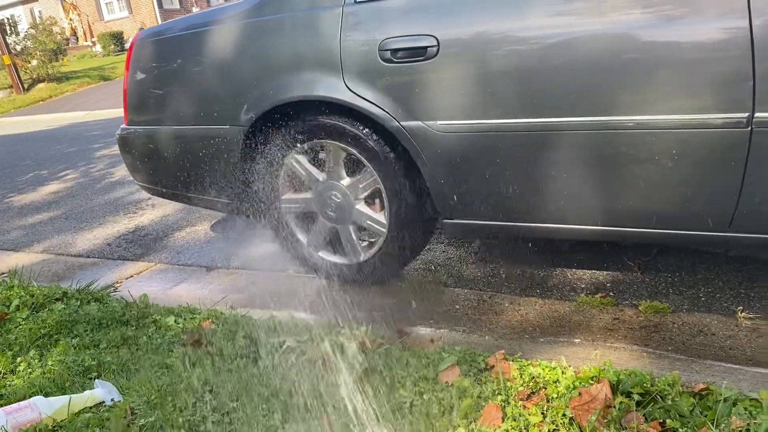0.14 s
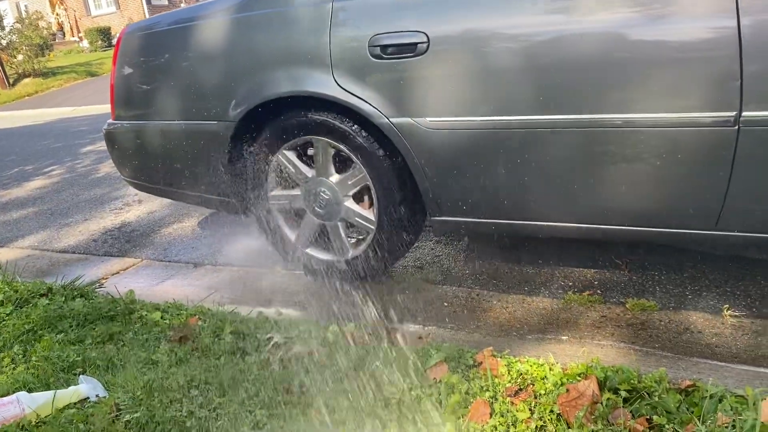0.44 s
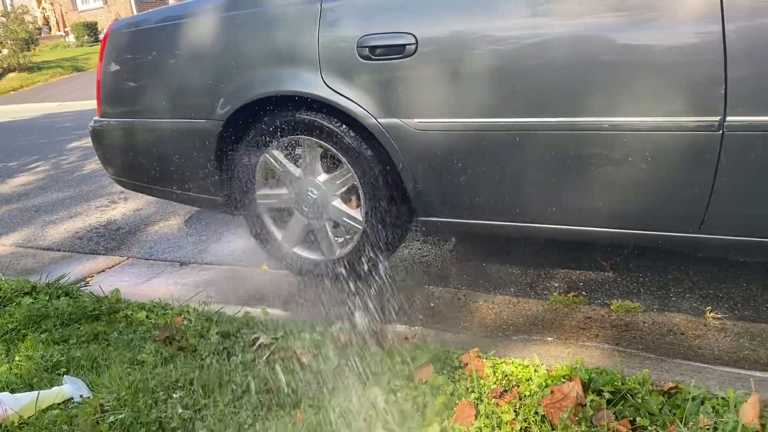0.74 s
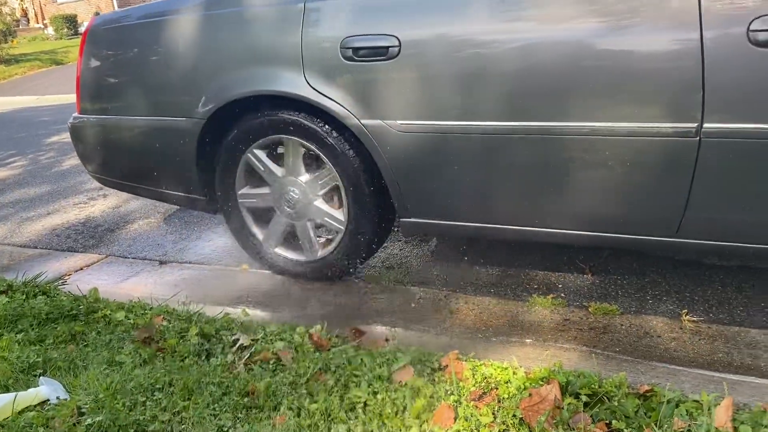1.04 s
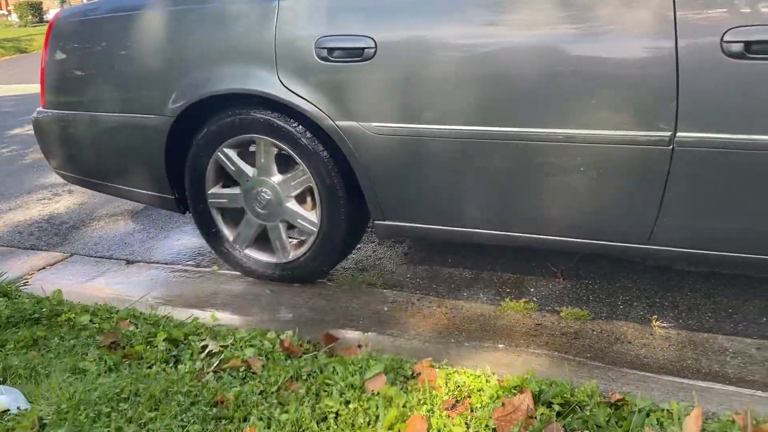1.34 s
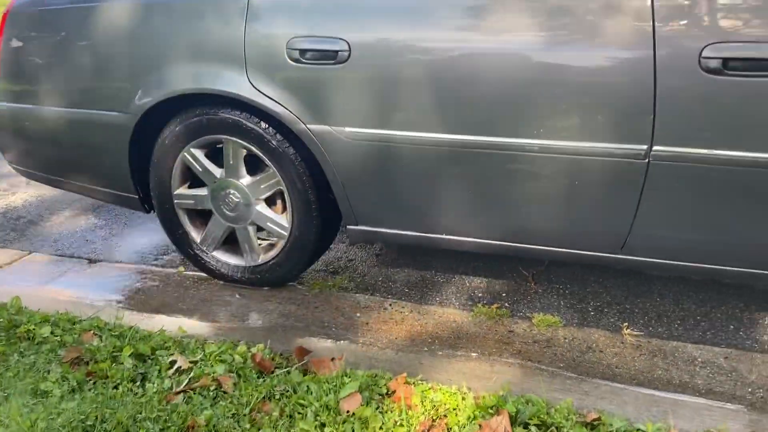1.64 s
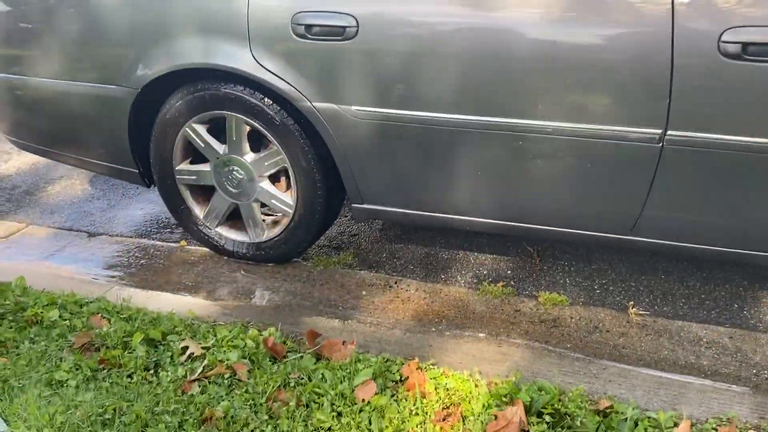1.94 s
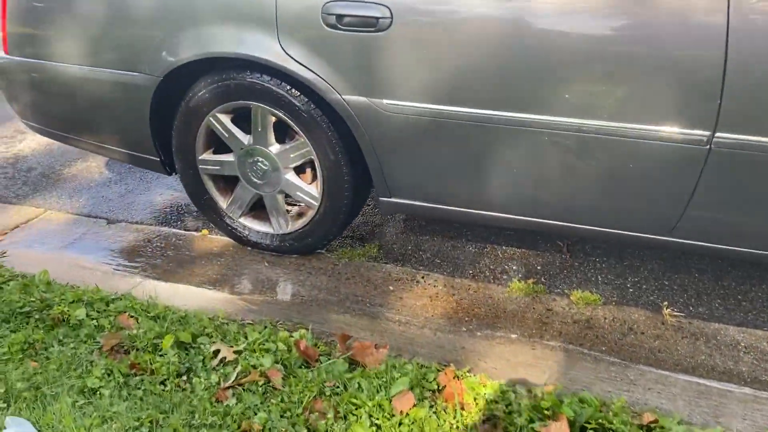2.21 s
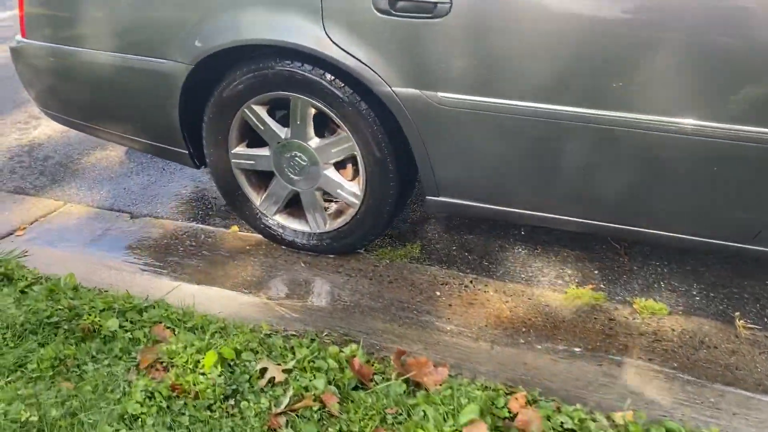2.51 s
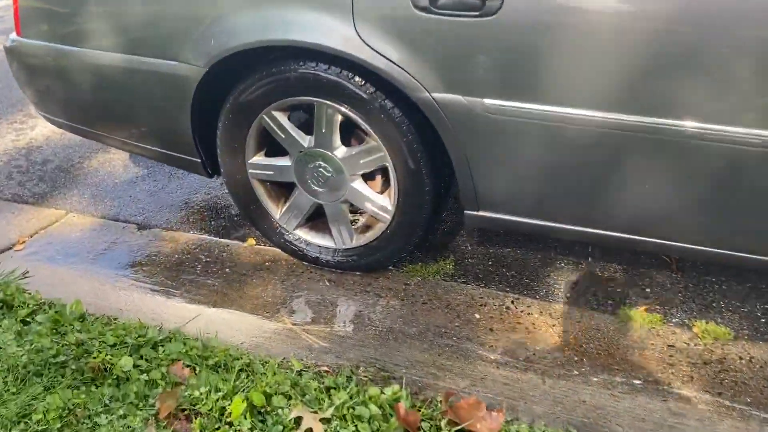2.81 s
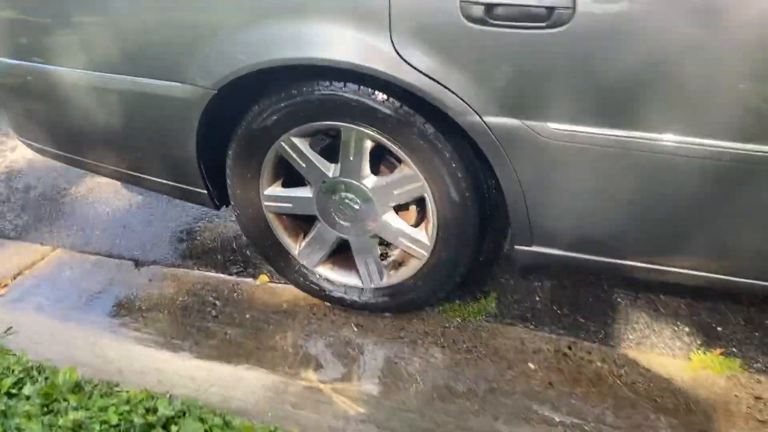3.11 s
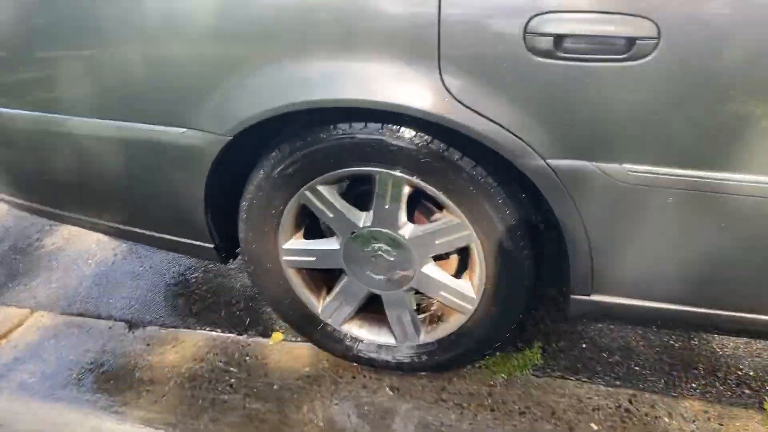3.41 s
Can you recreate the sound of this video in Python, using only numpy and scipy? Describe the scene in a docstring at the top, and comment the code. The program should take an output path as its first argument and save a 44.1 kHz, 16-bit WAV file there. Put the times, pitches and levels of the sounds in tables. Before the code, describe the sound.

Hose water spraying hard on a car wheel, shutting off, then buffeting wind and faint trickling

```python
"""A garden hose sprays a car wheel: the jet hisses as droplet noise, whistles at the nozzle, drums in
the wheel's hollows (noise through resonances) and is shut off. Wind buffets the microphone of a handheld
phone on the lawn as rumble, flutter and slaps. Feet rustle through wet grass (swells of noise), drops click
(damped rings), water trickles off (rising bubble tones) and the street hushes far away (steady noise)."""
import sys
import numpy as np
from scipy import signal
from scipy.fft import rfft, irfft, next_fast_len
from scipy.io import wavfile
from scipy.ndimage import uniform_filter1d, map_coordinates

SR = 44100
rng = np.random.default_rng(int(sys.argv[2]) if len(sys.argv) > 2 else 0)


def generate_wav(signal):
    """Clip the signal to [-1, 1] and save it as 16-bit WAV at the path in sys.argv[1]."""
    frames = np.transpose(np.atleast_2d(signal))
    scaled = np.clip(frames, -1, 1) * 32767
    pcm = np.round(scaled).astype(np.int16)
    wavfile.write(sys.argv[1], SR, pcm)


N = 156555  # length in samples
TOP_HZ = 15800  # upper band limit
DROP_SPREAD_DB = 4  # how unequal single droplets are


def amp(db):
    """Turn dB into gain."""
    return 10 ** (np.asarray(db) / 20)


def unit(x):
    """Scale to an rms of 1."""
    return x / np.sqrt(np.mean(x ** 2) + 1e-20)


def along(points, hz):
    """Read a curve of (Hz, value) points on a log frequency axis."""
    f, value = np.transpose(points)
    return np.interp(np.log(hz + 1), np.log(f + 1), value)


def curves(rows):
    """Give one value per sample for each column after the time."""
    s, *columns = np.transpose(rows)
    return [np.interp(np.arange(N) / SR, s, column) for column in columns]


def wobble(rate):
    """Draw a smooth random curve with rate knots a second."""
    knots = rng.standard_normal(int(N * rate / SR) + 4)
    return map_coordinates(knots, [np.arange(N) * rate / SR])


def filtered(x, response):
    """Filter x by a complex response of frequency."""
    m = next_fast_len(N + SR // 2)
    hz = np.fft.rfftfreq(m, 1 / SR)
    return irfft(rfft(x, m) * response(hz), m)[..., :N]


def noise(patchy_db, per_s=0, share=0):
    """Two unrelated noises with shared patches of gain; a share of their power comes as single droplets."""
    pair = rng.standard_normal((2, N))
    size_db = DROP_SPREAD_DB * np.clip(rng.standard_normal(N), -2, 2)
    hits = (rng.random(N) < per_s / SR) * amp(size_db)
    share = np.clip(share, 0, 1)
    pair = pair * np.sqrt(1 - share + share * unit(hits) ** 2)
    z = signal.stft(pair, nperseg=512)[2]
    # random gains smoothed over frequency, then over time
    field = uniform_filter1d(rng.standard_normal(z.shape[1:]), size=6, axis=0)
    field = uniform_filter1d(field, size=6, axis=1)
    return signal.istft(z * amp(patchy_db * unit(field)), nperseg=512)[1][:, :N]


def coloured(x, spectrum):
    """Give x a (Hz, dB) spectrum that falls away towards 0 Hz, at rms 1."""
    points = [(0, -120)] + list(spectrum)
    return unit(filtered(x, lambda hz: amp(along(points, hz))))


def ringing(x, hz, width_hz):
    """Pass x twice through one resonance, at rms 1."""
    def resonance(f):
        return 1j * f * width_hz / (hz * hz - f * f + 1j * f * width_hz)
    return unit(filtered(x, lambda f: resonance(f) ** 2))


SPRAY_PATCH_DB, DROPS_PER_S, DROP_SHARE = 1.3, 1800, .33
# the jet as it is shut off: t/s, mist level/dB, splash level/dB, nozzle whistle level/dB
JET_LEVELS = [(0, -35.5, -33, -37.5), (.054, -34.5, -36.5, -38), (.142, -38, -33, -33),
              (.165, -35, -35, -36.5), (.238, -38.5, -34, -33), (.29, -36, -30.5, -40),
              (.37, -42.5, -30, -45), (.494, -36.5, -34.5, -46), (.62, -36.5, -32.5, -57),
              (.74, -37.5, -37.5, -61), (.785, -38.5, -38.5, -66), (.81, -42.5, -41, -65),
              (.9, -42, -51, -70), (.98, -44, -63, -72), (1.05, -50, -68, -78), (1.3, -56.5, -82, -93),
              (2, -55.5, -78, -88), (2.6, -60, -83, -88), (3.55, -74, -80, -90)]
# colour of the splash on the wheel: f/Hz, relative level/dB per Hz
SPLASH_COLOUR = [(200, -9), (800, -6.5), (1300, -8.5), (2300, 5.5), (3000, -4), (4300, -2.5), (5500, -2),
                 (6500, -7), (8500, -5), (15600, -12)]
# colour of the mist in the air: f/Hz, relative level/dB per Hz
MIST_COLOUR = [(2000, -12), (4500, -9), (6500, -9), (7500, -1), (9000, -4), (14000, -3.5), (15600, -8)]


def jet():
    """Droplets splash on tyre and metal and hiss as mist, while the nozzle whistles."""
    mist_db, splash_db, whistle_db = curves(JET_LEVELS)
    drops = noise(SPRAY_PATCH_DB, DROPS_PER_S, DROP_SHARE)
    flicker_db = 1.25 * wobble(44.1)
    mist = amp(mist_db + flicker_db) * coloured(drops, MIST_COLOUR)
    splash = amp(splash_db + flicker_db) * coloured(drops, SPLASH_COLOUR)
    return mist + splash + whistle(whistle_db)


WHISTLE_HZ, WHISTLE_WIDTH_HZ, WHISTLE_WAVER_DB = 4760, 500, 2.2  # width of each resonance pass


def whistle(level_db):
    """The nozzle's resonance turns rushing noise into a wavering, breathy tone."""
    tone = ringing(noise(WHISTLE_WAVER_DB), WHISTLE_HZ, WHISTLE_WIDTH_HZ)
    return amp(level_db + WHISTLE_WAVER_DB * wobble(69)) * tone


SHUT_S, FADE_DB_PER_S = 1.2, 120  # the drumming dies away
DRUM_WAVER_DB = 1.5
# the wheel's hollows: f/Hz, width of each resonance pass/Hz
HOLLOWS = [(1110, 200), (1550, 230), (2000, 160), (3050, 480)]
# the jet wanders over the wheel and wakes its hollows in turn, before the fade:
# t/s, then level/dB of each of the four hollows
DRUM_LEVELS = [(0.0, -44.5, -47, -48, -49), (0.08, -53, -52, -53, -64), (0.128, -49, -46.5, -52, -61),
               (0.212, -43, -44, -68, -64), (0.25, -53, -46, -58, -46), (0.304, -39.5, -41, -35.5, -45),
               (0.362, -47.5, -50, -63, -65), (0.444, -41.5, -42, -42, -43), (0.516, -56, -45, -42, -53),
               (0.57, -44, -42, -53, -49), (0.608, -50, -43.5, -48, -49), (0.772, -47, -49, -48, -51),
               (0.824, -65, -56, -58, -49), (0.862, -48, -57, -60, -65), (0.902, -57, -54, -63, -63),
               (1.05, -58.5, -57, -71, -65)]


def wheel_drum():
    """The jet's noise sets the wheel's hollows ringing, each at its own pitch."""
    fade_db = FADE_DB_PER_S * np.maximum(np.arange(N) / SR - SHUT_S, 0)
    drum = np.zeros((2, N))
    for (hz, width_hz), level_db in zip(HOLLOWS, curves(DRUM_LEVELS)):
        ring = ringing(noise(DRUM_WAVER_DB), hz, width_hz)
        drum += amp(level_db - fade_db + DRUM_WAVER_DB * wobble(31.1)) * ring
    return drum


# gusts: t/s, rumble level/dB, flutter level/dB
GUSTS = [(0.0, -41.5, -43), (0.1, -36.5, -45), (0.12, -42, -43), (0.14, -36, -45), (0.19, -42, -43.5),
         (0.26, -31.5, -42.5), (0.3, -44.5, -46), (0.47, -41, -43.5), (0.57, -39, -38.5), (0.59, -42, -34),
         (0.63, -33.5, -40), (0.76, -48, -44.5), (0.81, -35.5, -40.5), (0.87, -52, -51.5),
         (0.9, -36, -40.5), (0.96, -39.5, -43), (1.0, -49, -58), (1.05, -38, -40.5), (1.15, -44, -50),
         (1.21, -39, -46), (1.24, -39, -44), (1.26, -32, -40), (1.31, -39, -49), (1.39, -33, -41),
         (1.41, -40.5, -45), (1.45, -29, -44), (1.5, -42.5, -57), (1.62, -37, -47), (1.64, -45, -51),
         (1.69, -43, -51), (1.72, -31, -44), (1.76, -36.5, -46), (1.82, -46, -47.5), (1.94, -41, -45.5),
         (1.97, -54, -51), (2.01, -38, -45.5), (2.04, -53, -49), (2.07, -39, -42.5), (2.11, -48, -42),
         (2.13, -32.5, -42), (2.19, -41.5, -45), (2.32, -39.5, -42.5), (2.35, -43, -41), (2.4, -27, -35.5),
         (2.45, -33, -37.5), (2.52, -32.5, -37), (2.55, -27, -37.5), (2.58, -38, -42), (2.7, -30, -42),
         (2.75, -42, -43), (2.77, -28, -36.5), (2.85, -35, -36), (2.88, -37, -37), (3.01, -34, -38.5),
         (3.02, -37, -44.5), (3.21, -38, -39.5), (3.32, -27.5, -37), (3.37, -39, -36.5), (3.45, -32.5, -38),
         (3.55, -33, -37)]
# colour of the rumble: f/Hz, relative level/dB per Hz
RUMBLE_COLOUR = [(12, -23), (25, -45), (40, -5), (59, 1.5), (81, 2), (150, -8.5), (220, -15), (500, -39),
                 (2000, -71)]
# colour of the flutter: f/Hz, relative level/dB per Hz
FLUTTER_COLOUR = [(90, -10.5), (160, -3), (300, -6), (500, -10.5), (800, -24), (1300, -23)]


def wind_roar():
    """Wind on the microphone makes a lumpy low rumble and a faster, higher flutter."""
    rumble_db, flutter_db = curves(GUSTS)
    rumble = amp(0.65 * wobble(14)) * coloured(noise(0.86), RUMBLE_COLOUR)
    flutter = amp(2.3 * wobble(55)) * coloured(noise(1.0), FLUTTER_COLOUR + [(4000, -61)])
    return amp(rumble_db) * unit(rumble) + amp(flutter_db) * unit(flutter)


SLAP_RISE_S, SLAP_GLIDE, SLAP_NOISE = 0.0032, 0.99, 0.6  # rise time, extra early pitch, turbulence gain
# wind slaps: start t/s, level of the swing/dB, settled pitch f/Hz
SLAPS = [(0.282, -29.5, 228), (0.545, -30.5, 490), (0.819, -36, 129), (1.028, -30, 337),
         (1.334, -29.5, 312), (1.377, -27, 244), (1.406, -30.5, 282), (1.721, -37.5, 190),
         (2.128, -31.5, 285), (2.4, -24.5, 337), (2.437, -25, 232), (2.482, -33.5, 298),
         (2.544, -32.5, 136), (2.575, -31.5, 350), (2.638, -36.5, 380), (2.764, -32, 200),
         (2.822, -29.5, 385), (2.966, -30, 305), (3.037, -32, 230), (3.114, -28.5, 222),
         (3.198, -29.5, 332), (3.289, -23.5, 303), (3.408, -26.5, 308), (3.493, -23, 425),
         (3.532, -29, 304)]


def wind_slaps():
    """Single eddies slap the microphone: a short swing of gliding pitch with some turbulent noise."""
    out, t = np.zeros((2, N + SR)), np.arange(SR // 20) / SR
    eddies = coloured(noise(0.5), [(100, 12.5), (200, 6.5), (600, 8.5), (900, -7.5), (2000, -65)])
    u = t / SLAP_RISE_S
    swell = u * np.exp(1 - u)
    for (s, db, hz), turn in zip(SLAPS, rng.random(len(SLAPS))):
        at = round(s * SR)
        cycles = hz * t * (1 + SLAP_GLIDE * np.exp(-u)) + turn
        swing = np.sin(2 * np.pi * cycles) * [[1], [.3]]  # mostly direct sound
        turbulence = SLAP_NOISE * eddies[:, at // 2:][:, :len(t)]
        out[:, at:at + len(t)] += amp(db) * swell * (swing + turbulence)
    return out[:, :N]


GRASS_PATCH_DB = 1.2
# steps in grass: middle t/s, length/s (times 0.82 sets the swell), level before the tilt/dB, tilt/dB per octave
STEPS = [(1.124, 0.042, -44, 5), (1.21, 0.034, -43, 2.5), (1.457, 0.27, -47.5, 0.5),
         (1.702, 0.028, -46.5, -2.5), (1.848, 0.045, -49, 0), (2.073, 0.036, -43, -1),
         (2.624, 0.044, -43, -1.5), (2.784, 0.047, -42, 1.5), (3.033, 0.023, -57, 4),
         (3.29, 0.035, -64, 11.5)]
# colour of the grass before the tilt: f/Hz, relative level/dB per Hz
GRASS_COLOUR = [(700, 3.5), (1500, 3.5), (3000, -3), (7000, -3), (11000, -8), (15600, -23)]


def steps():
    """Each step is a short swell of crackling blades, some brighter than others."""
    t, out = np.arange(N) / SR, np.zeros((2, N))
    blades = coloured(noise(GRASS_PATCH_DB, 900, 0.35), GRASS_COLOUR)
    for s, length, db, bright_db in STEPS:
        swell = amp(db) * np.exp(-np.abs((t - s) / (length * 0.82)) ** 3.4)
        # the tilt turns about 4 kHz
        out += filtered(swell * blades, lambda hz: amp(bright_db * np.log2((hz + 1) / 4000)))
    return out


CLICK_RISE_S = .0004
# drops and stalks: start t/s, level before doubling/dB, middle f/Hz, spread each way/octaves, 60 dB decay/s
DROP_CLICKS = [(.542, -25, 11700, .5, 0.0043), (.565, -26.5, 3000, 0.19, 0.011),
               (.582, -24, 12000, .3, .005), (.614, -32, 3900, .2, .008), (.669, -26, 3160, 0.25, .01),
               (.784, -31, 3200, 0.15, .008), (.949, -39.5, 3430, 0.099, 0.011),
               (1.019, -32.5, 7400, 0.41, 0.0065), (1.057, -31, 10600, 0.72, 0.0058),
               (1.734, -28.5, 11600, 0.83, 0.0044), (2.078, -37, 4300, 0.34, .008),
               (2.144, -39, 2840, 0.25, .008), (2.351, -37.5, 6870, 0.18, .006),
               (2.477, -42, 2250, .1, .014), (2.596, -41, 2540, 0.65, .006), (2.624, -36, 2400, .4, 0.0088),
               (2.769, -37, 4450, 0.2, .006), (2.781, -34, 1590, 0.4, 0.0084),
               (2.798, -35, 3000, 0.76, .006), (3.034, -45, 12500, 0.33, .005),
               (3.118, -27, 6200, 0.95, 0.0056)]


def clicks():
    """Single drops and snapping stalks: a cluster of tiny damped rings spread around a pitch."""
    out, t = np.zeros((2, N + SR)), np.arange(SR // 50) / SR
    place = np.linspace(-1, 1, num=11)[:, None]  # from lowest to highest ring
    for s, db, hz, octaves, t60 in DROP_CLICKS:
        ring_hz = np.minimum(hz * 2 ** (octaves * place), TOP_HZ)
        rings = np.sin(2 * np.pi * (ring_hz * t + rng.random(place.shape)))
        cluster = unit((rings * (1.3 - place ** 2)).sum(0))
        envelope = amp(db - 60 * t / t60) * (1 - np.exp(-t / CLICK_RISE_S))
        out[0, round(s * SR):][:len(t)] += envelope * cluster * 2  # direct sound only
    return out[:, :N]


TRICKLE_PER_S, TRICKLE_HZ, TRICKLE_SPREAD = 260, 1860, .18  # bubble rate, middle pitch, log pitch spread
TRICKLE_CYCLES, BUBBLE_RISE = 9, .007  # cycles up to the loudest moment, pitch rise
BUBBLE_SPREAD_DB = 18  # loudest over faintest bubble
# water running off: t/s, level of the loudest bubble/dB
RUN_OFF_LEVELS = [(0, -43), (1.5, -52), (1.75, -50), (1.85, -43.5), (2.02, -43), (2.15, -47.5), (2.3, -44),
                  (2.48, -52), (2.55, -51), (2.64, -40), (2.72, -44.5), (2.86, -48.5), (2.97, -43.5),
                  (3.05, -50), (3.3, -55), (3.55, -42.5)]


def trickle():
    """Water runs off the tyre: small bubbles with a soft start and a rising pitch."""
    gap, pitch, size, side = rng.random((1100, 4)).T[..., None]
    when = np.cumsum(-np.log(1 - gap), 0) / TRICKLE_PER_S  # random waits between bubbles
    hz = TRICKLE_HZ * np.exp(TRICKLE_SPREAD * (2 * pitch - 1))
    t = np.arange(SR // 30) / SR
    u = t * hz / TRICKLE_CYCLES
    level = amp(np.interp(when, *np.transpose(RUN_OFF_LEVELS)) - BUBBLE_SPREAD_DB * size)
    tone = np.sin(2 * np.pi * hz * t * (1 + BUBBLE_RISE * u))
    bubbles = level * u * np.exp(1 - u) * tone
    at = np.minimum((when * SR).astype(int) + np.arange(len(t)), N)  # late samples land in a spare slot
    parts = [np.bincount(at.ravel(), (bubbles * gain).ravel(), N + 1)[:N] for gain in (1, side - .5)]
    return np.array(parts)  # direct, diffuse


HUSH_DB, HUSH_PATCH_DB = -41.5, 1.5
# colour of the far street: f/Hz, relative level/dB per Hz
HUSH_COLOUR = [(150, 3.5), (400, -3), (800, 1), (1200, -1.5), (1700, -3), (2500, -10), (4000, -12.5),
               (5000, -12.5), (6900, -14), (7600, -18.5), (10500, -17), (11300, -24), (13500, -22.5),
               (15600, -33)]


def street_hush():
    """The far street is a soft broad noise whose level sways slowly and quickly."""
    level_db = HUSH_DB + 0.52 * wobble(2.68) + 0.83 * wobble(15)
    return amp(level_db) * coloured(noise(HUSH_PATCH_DB, 650, 0.06), HUSH_COLOUR)


# treble stereo image: f/Hz, left channel's lead/half turns (less the lead at 0 Hz), likeness/0-1
TREBLE_STEREO = [(7900, -1.12, .8), (8350, -1, 1), (9750, -1, 1), (10100, -.85, .8), (10700, -.5, .68),
                 (11300, -.05, .9), (11500, 0, 1), (13000, 0, 1), (13450, .3, .68), (14000, .7, .55),
                 (14600, 1, 1), (16000, 1, 1)]


def stereo(pair, phase, alike, pan):
    """Direct and diffuse sound are spread over two channels by phase, likeness and balance."""
    top_hz, top_lead, top_alike = np.transpose(TREBLE_STEREO)
    all_alike = alike + list(zip(top_hz, top_alike))
    f, lead = np.transpose(phase + list(zip(top_hz, top_lead)))

    def mix(hz):
        """Weigh direct against diffuse sound to set how alike the channels are."""
        turn = np.arccos(np.clip(along(all_alike, hz), 0, 1)) / 2
        return np.array([np.cos(turn), np.sin(turn)])

    def lean(hz):
        """Give the left channel half the balance and lead, and the right one the opposite half."""
        shift = np.interp(hz, f, lead - lead[0])
        left = amp(along(pan + [(top_hz[1], 0)], hz) / 2) * np.exp(.5j * np.pi * shift)
        return np.array([left, 1 / left])

    direct, diffuse = filtered(pair, mix)
    return filtered(np.array([direct + diffuse, direct - diffuse]), lean)


DRUM_SPREAD = 0.78  # gain of the drumming that is opposite in the two channels
# phase of the jet: f/Hz, left channel's lead/half turns
NEAR_LEAD = [(0, 0), (345, -.15), (1030, -.35), (1720, -.8), (2400, -1.1), (3100, -1.9), (3800, -2),
             (4500, -1.85), (5150, -2), (5850, -2.35), (6550, -2), (7250, -1.45)]
# likeness of the channels for the jet: f/Hz, likeness/0-1
NEAR_LIKENESS = [(300, 0.95), (900, 0.91), (1400, 0.47), (2300, 0.78), (4000, 0.72), (4800, 0.89),
                 (6000, 0.39), (7300, 0.86)]
# balance of the jet: f/Hz, left over right level/dB
NEAR_BALANCE = [(900, 1), (1500, -2.5), (2200, -1.5), (3000, -6), (4100, -5), (4800, 0), (6500, -1),
                (7300, 0.5)]
# phase of the surroundings: f/Hz, left channel's lead/half turns (less the first row's lead)
FAR_LEAD = [(0, 2), (345, 1.87), (1030, 1.4), (1720, .55), (2400, 0), (3100, -.2), (3800, -.05),
            (4500, -.15), (5150, -.6), (5850, -1.8), (6550, -1.95), (7250, -1.8)]
# likeness of the channels for the surroundings: f/Hz, likeness/0-1
FAR_LIKENESS = [(60, 0.9), (300, 0.76), (1500, 0.64), (4500, 0.56), (5600, 0.13), (6600, 0.88),
                (7400, 0.23)]
# balance of the surroundings: f/Hz, left over right level/dB
FAR_BALANCE = [(500, 0), (1000, -2), (1700, 4), (2500, -2), (3500, -1), (5700, -3.5), (6900, 2.5)]


def scene():
    """The jet and the surroundings each have a stereo image; the drumming spreads about the middle."""
    spray = stereo(jet(), NEAR_LEAD, NEAR_LIKENESS, NEAR_BALANCE)
    drum = wheel_drum()
    wheel = drum[0] + DRUM_SPREAD * drum[1] * [[1], [-1]]
    around = wind_roar() + wind_slaps() + steps() + clicks() + trickle() + street_hush()
    return spray + wheel + stereo(around, FAR_LEAD, FAR_LIKENESS, FAR_BALANCE)


def record(dry):
    """Nothing above the band limit is kept."""
    return filtered(dry, lambda hz: hz < TOP_HZ)


dry = scene()
out = record(dry)
generate_wav(out)
```